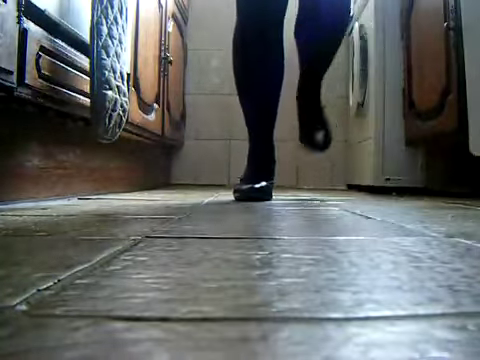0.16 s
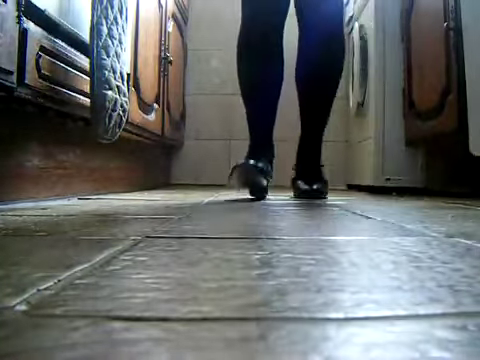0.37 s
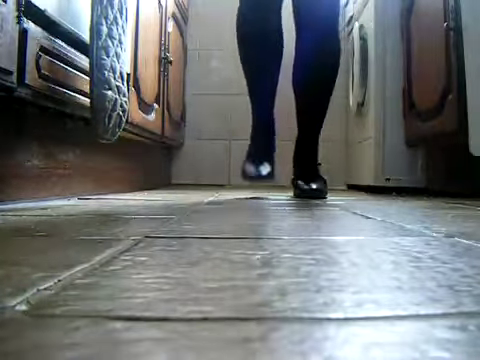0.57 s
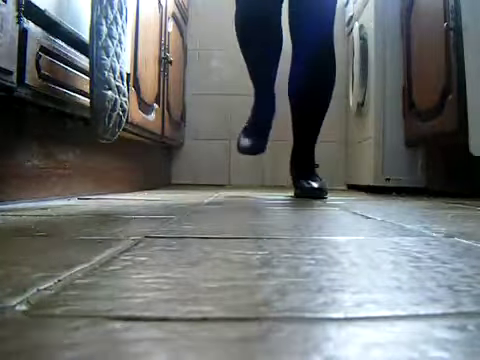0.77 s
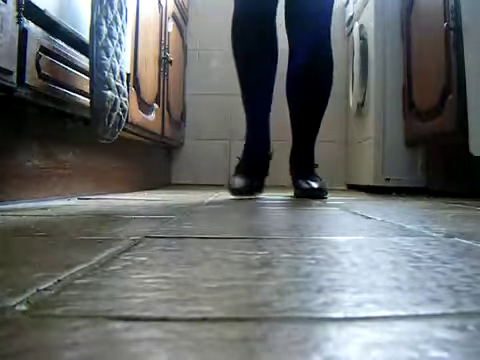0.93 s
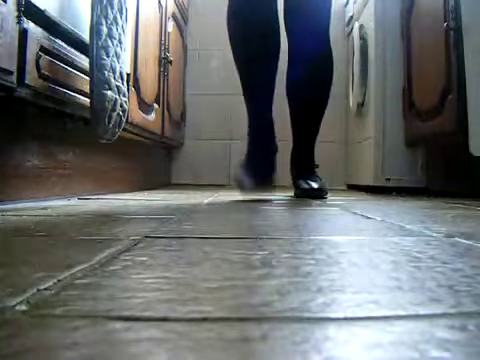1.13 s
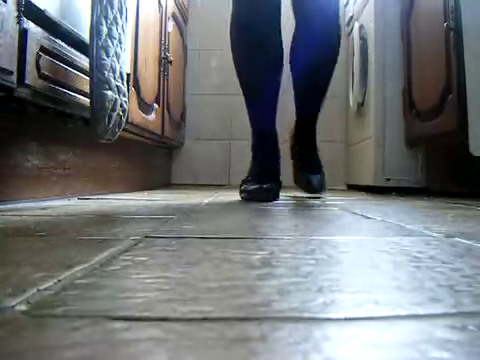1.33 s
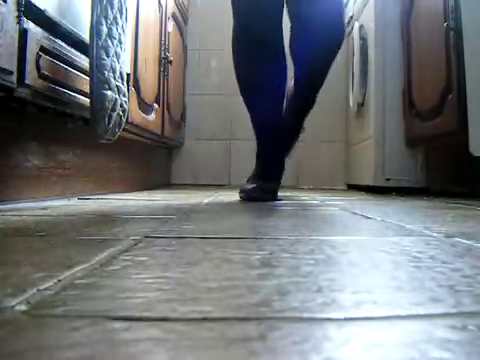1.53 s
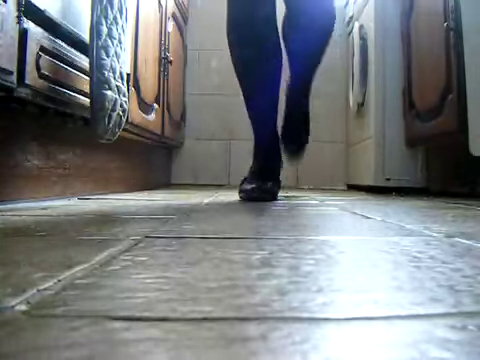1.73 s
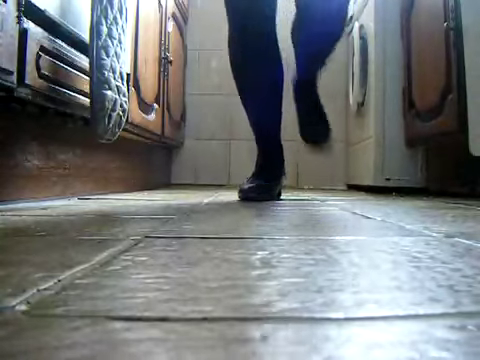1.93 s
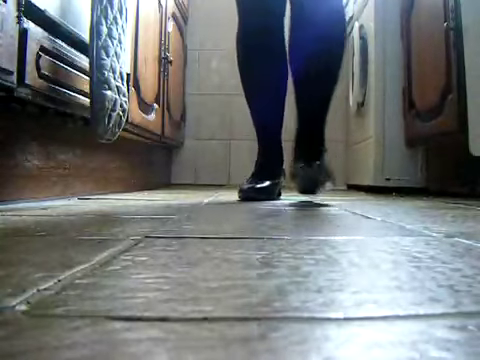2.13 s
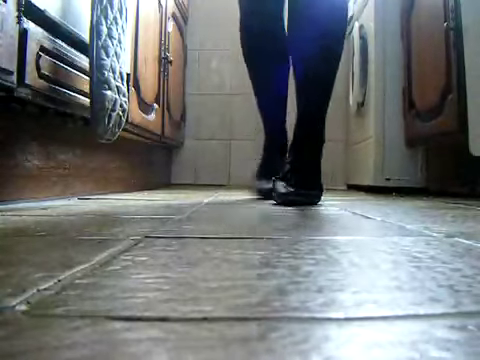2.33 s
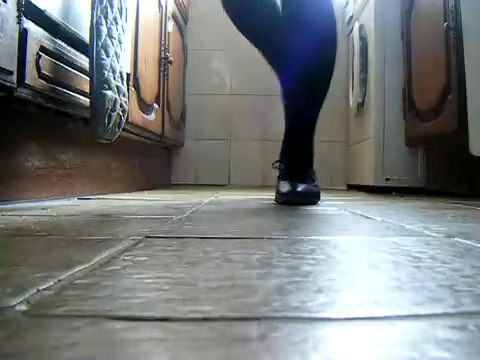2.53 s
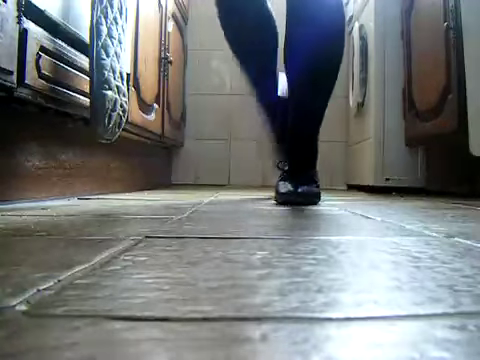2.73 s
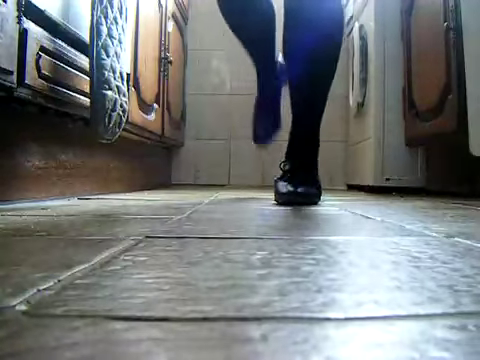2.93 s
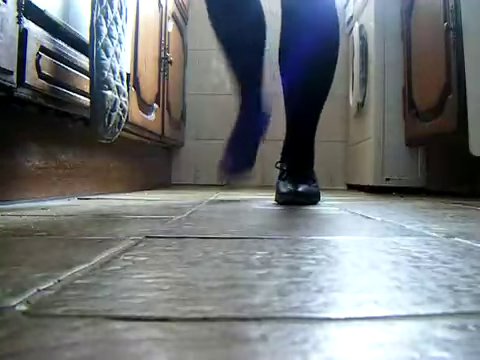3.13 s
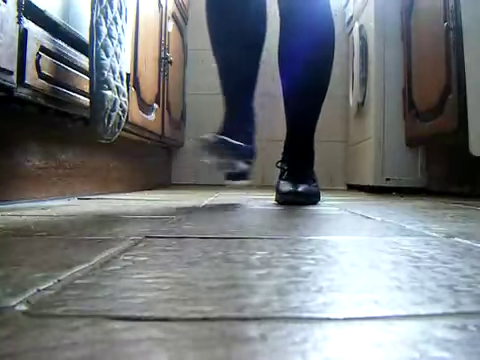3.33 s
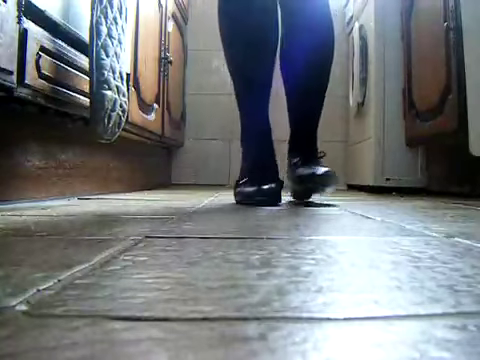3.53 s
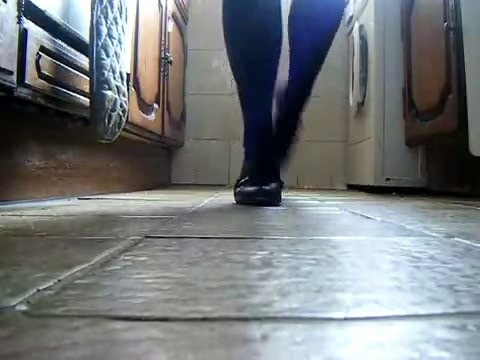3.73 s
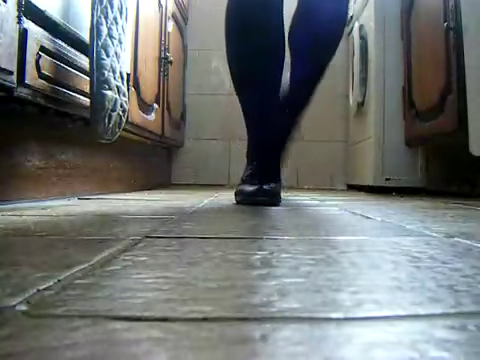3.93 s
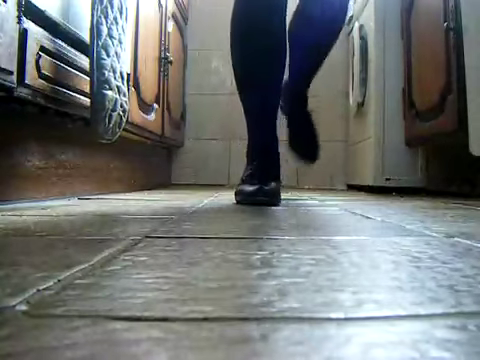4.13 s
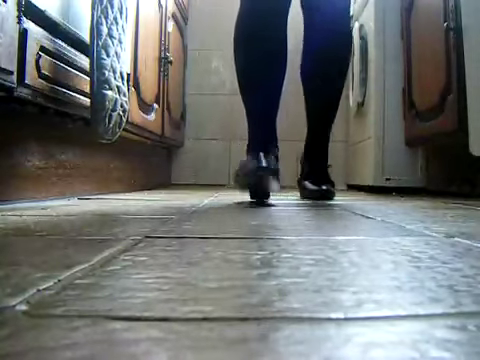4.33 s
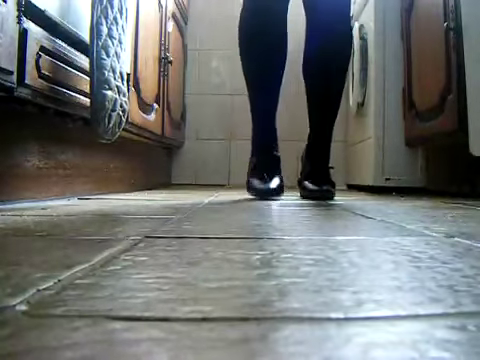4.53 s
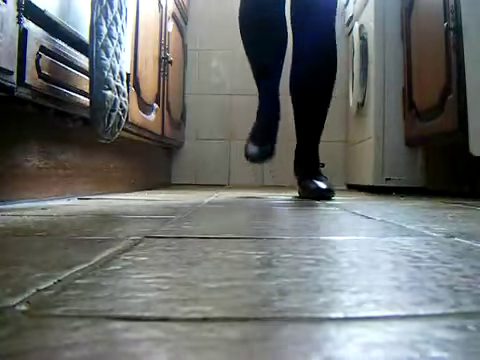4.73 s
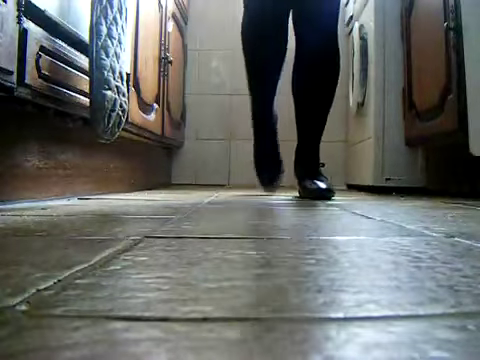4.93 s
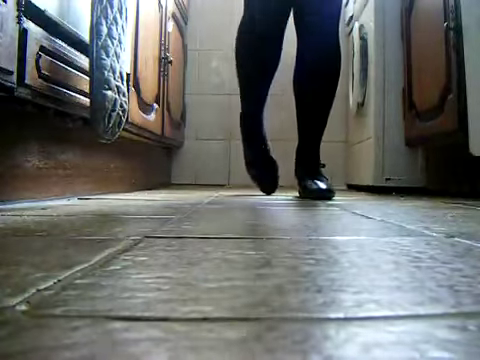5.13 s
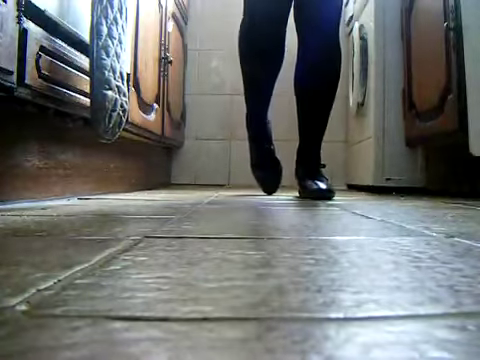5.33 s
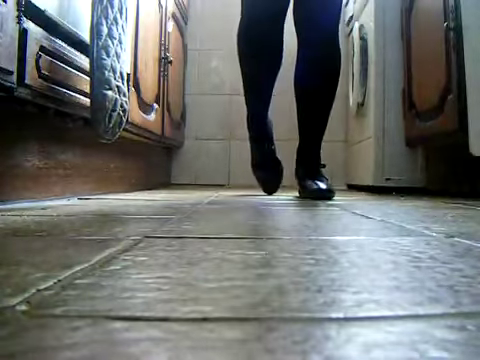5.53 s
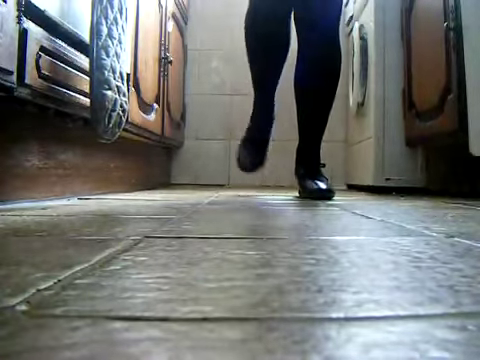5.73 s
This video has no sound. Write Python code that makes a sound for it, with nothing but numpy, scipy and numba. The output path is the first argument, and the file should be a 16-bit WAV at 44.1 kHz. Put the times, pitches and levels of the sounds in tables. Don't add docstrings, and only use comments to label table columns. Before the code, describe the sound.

Tap shoes with metal plates strike a tiled kitchen floor, heard from a small camera microphone lying on the tiles. A hard ringing blow lands at 0.1 s, followed by a medium tap at 0.5 and a sharp scraping brush near 0.7. Lighter taps and rattles follow around 1.1 to 1.6, then a heel thud at 1.8. A quick cluster runs from 2.0 to 2.75, with a brush and heel together at 3.0. Hard, bright toe clacks hit at 3.4 and 3.85, a heel at 4.2, a firm toe at 4.5 and a strong scrape at 4.7. Sparse brushes at 4.9 and 5.2 end with a soft heel; then only quiet room air, hiss and a barely audible refrigerator hum. Faint shoe and cloth shuffling lies between blows. Every hit has a short, boxy echo of about 0.3 s, pumped up by gain control, with crunchy clipped attacks and little high treble.

```python
import sys
import numpy as np
from scipy import signal
from scipy.fft import rfft, irfft, next_fast_len
from scipy.io import wavfile
from scipy.ndimage import map_coordinates
from numba import njit

SR = 44100
rng = np.random.default_rng(int(sys.argv[2]) if len(sys.argv) > 2 else 0)


def makeup_ratio(level_db):
    decades = np.asarray(level_db, float) / 20
    return 10 ** decades


def unload_audio(sound):
    columns = np.transpose(np.atleast_2d(sound))
    steps = np.round(np.clip(columns, -1, 1) * 32767)
    wavfile.write(sys.argv[1], SR, steps.astype(np.int16))


N = 255339
CONTACT_SIZE = 1 << 14
SQUARE_BLOW = dict(crack_db=1, crack_t60_s=0.029, rise_s=0.00049, tick_db=3, scrape_db=1.0)
TOE_CLICK_HZ = 3990

# (time [s], force [dB], plate ring [Hz], plate click [dB], overtone [Hz])
TOE_BLOWS = [
    (0.0871, 14, 956, -7.5, 2870),
    (0.4873, 6.5, 1017, -7, 3980),
    (1.383, 3.5, 874, -5.5, 4340),
    (2.2385, 5, 1087, -14, 5560),
    (2.404, 5.5, 1062, -9, 2110),
    (2.5604, 4, 833, -1, 3600),
    (3.3906, 13.5, 884, -0.5, 5500),
    (3.6615, 6.5, 717, -7, 2050),
    (3.842, 12.5, 1143, -14.5, 3400),
    (4.4894, 8.5, 1042, -12, 4210),
]


def toe_blows():
    time_s, force_db, ring_hz, click_db, overtone_hz = np.transpose(TOE_BLOWS)
    click_hz = TOE_CLICK_HZ + 0.17 * (overtone_hz - TOE_CLICK_HZ)
    crack = taps(time_s, force_db, -29.5, ring_hz, click_db, click_hz, **SQUARE_BLOW)
    clack_db = 5.5 + 0.79 * force_db
    return crack + clacks(time_s, clack_db, 1.061 * ring_hz, force_db - 6.5, overtone_hz)


# (time [s], force [dB])
HEEL_DROPS = [
    (1.8334, 2),
    (2.9975, 1.5),
    (3.056, -16),
    (4.2098, 2),
    (5.2146, -10.5),
]


def heel_drops():
    time_s, force_db = np.transpose(HEEL_DROPS)
    click_hz = 3600
    thud = taps(time_s, force_db, 20, 480, -11, click_hz, **SQUARE_BLOW)
    return thud + clacks(time_s, force_db - 9, 560, force_db - 30, click_hz)


# (time [s], force [dB], plate ring [Hz], plate click [dB])
LIGHT_TOUCHES = [
    (0.0641, -20, 1460, 21),
    (0.452, -23.5, 850, -16),
    (3.188, -25, 960, -13),
    (3.5893, -24.5, 870, -16),
]


def light_touches():
    time_s, force_db, ring_hz, click_db = np.transpose(LIGHT_TOUCHES)
    touch = taps(time_s, force_db, -7, ring_hz, click_db, TOE_CLICK_HZ, **SQUARE_BLOW)
    return touch + clacks(time_s, force_db + 5, ring_hz, force_db - 23.5, TOE_CLICK_HZ)


# (time [s], force [dB], plate ring [Hz], clack [Hz], plate click [Hz])
GLANCING_BRUSHES = [(0.2938, -6, 1730, 1500, 2100), (0.6452, -13, 766, 770, 2960),
                    (0.684, 6.5, 726, 3100, 3300), (0.8522, -2.5, 920, 1070, 4600),
                    (1.085, -0.5, 770, 1587, 3700), (1.6077, 4.5, 640, 1700, 3120),
                    (2.0121, 2.5, 674, 1725, 2200), (2.743, -2, 620, 1100, 2030),
                    (2.994, 2, 560, 2185, 3800), (3.2196, -8, 874, 2050, 2000),
                    (4.0284, -7, 1010, 1564, 2040), (4.6834, 10, 688, 2430, 2750),
                    (4.9256, -1, 620, 1110, 4620), (5.1781, 2.5, 935, 1690, 3400)]


def glancing_brushes():
    time_s, force_db, ring_hz, clack_hz, click_hz = np.transpose(GLANCING_BRUSHES)
    thud_db = -0.5 - 0.3 * force_db
    click_db = -2 + 0.42 * force_db
    brush = taps(time_s, force_db, thud_db, ring_hz, click_db, click_hz,
                 crack_db=3.5, crack_t60_s=0.017, rise_s=0.00022, tick_db=12.5, scrape_db=0)
    return brush + clacks(time_s, 4.5 + 0.98 * force_db, clack_hz, force_db - 15, click_hz)


# (time [s], force [dB], plate ring [Hz], plate click [dB])
PLATE_ROCKS = [(0.001, -12, 645, -2), (0.1551, -12, 796, -35), (0.5488, -9.5, 975, -10),
               (0.5832, -6, 1080, -6.5), (1.1284, -2, 880, 6), (1.1566, -0.5, 990, 20),
               (1.4687, -12.5, 820, -7), (1.5036, -11, 910, 3.5), (1.5265, -11.5, 837, -4.5),
               (2.0673, -17.5, 474, -21), (2.3177, -4, 747, -5.5), (2.605, 0, 1130, 7),
               (2.6235, -13.5, 870, 1.5), (2.631, -9, 990, 14), (2.258, -1, 1065, -6.5),
               (2.676, -10.5, 840, -4), (3.4132, -2, 730, 15), (3.781, -17.5, 800, -6.5),
               (3.8892, 0.5, 1210, 13.5), (4.6145, -14, 1030, 23), (4.7298, -3, 815, -1),
               (0.715, -0.5, 760, 19.5), (3.438, -5, 800, -1)]


def plate_rocks():
    time_s, force_db, ring_hz, click_db = np.transpose(PLATE_ROCKS)
    return taps(time_s, force_db, -8.5, ring_hz, click_db, 3880,
                crack_db=1.5, crack_t60_s=0.072, rise_s=0.00037, tick_db=-39.0, scrape_db=-5.5)


# (delay [s], level [dB])
WALL_ECHOES = [(.0022, -22.5), (.0046, -39), (.0075, -6), (0.0125, -10), (.021, -19)]
# (centre [Hz], width [Hz], level [dB])
CUPBOARD_MODES = [(249.4, 3.9, 0), (304.6, 14, 3.5), (328, 8.9, -11), (392.2, 7.4, 6), (620, 200, -2),
                  (766, 58, -1), (836, 15, 4.5), (1087, 240, -0.5), (2900, 21, -11), (3980, 79, -21)]


def taps(time_s, force_db, thud_db, ring_hz, click_db, click_hz, *, crack_db, crack_t60_s, rise_s, tick_db, scrape_db):
    time_s, force_db, thud_db, ring_hz, click_db, click_hz = columns(
        time_s, force_db, thud_db, ring_hz, click_db, click_hz)
    lead_s = 0.0038
    count, lead = len(time_s), round(lead_s * SR)
    shape = (count, CONTACT_SIZE)
    t, f = np.arange(CONTACT_SIZE) / SR, np.fft.rfftfreq(CONTACT_SIZE, 1 / SR)

    envelope = makeup_ratio(crack_db - 60 * t / crack_t60_s) * (1 - np.exp(-t / rise_s))
    crack = envelope * rng.standard_normal(shape)
    early = crack.copy()
    for delay_s, db in WALL_ECHOES:
        early += makeup_ratio(db) * np.roll(crack, round(delay_s * SR), axis=1)
    early = np.roll(early, lead, axis=1)
    through_floor = makeup_ratio(-24) * np.linspace(.3, 1, lead)
    early[:, :lead] = through_floor * rng.standard_normal((count, lead))
    tail = np.roll(echoes(count, CONTACT_SIZE), lead, axis=1)
    tail[:, :lead] = 0

    tile = np.abs(resonance(f, 1720, 2830))
    ring = np.abs(resonance(f, ring_hz, ring_hz / 1.6)) ** 2
    click = makeup_ratio(click_db) * np.abs(resonance(f, click_hz, 1150)) ** 2
    thud = makeup_ratio(thud_db) * np.abs(resonance(f, 293.4, 280)) ** 2
    scrape = makeup_ratio(click_db + scrape_db) * tile
    shoe = unit(np.sqrt(ring ** 2 + click ** 2 + thud ** 2 + scrape ** 2))

    modes = sum(makeup_ratio(db) * resonance(f, hz, width_hz) for hz, width_hz, db in CUPBOARD_MODES)
    room = 1 + modes / 2
    direct = rfft(early) * causal(np.hypot(shoe, makeup_ratio(tick_db) * tile))
    sound = irfft(direct + rfft(tail) * causal(shoe) * room, CONTACT_SIZE)
    return lay(time_s[:, 0] - lead_s, makeup_ratio(force_db) * sound)


def clacks(time_s, clack_db, clack_hz, overtone_db, overtone_hz):
    time_s, clack_db, clack_hz, overtone_db, overtone_hz = columns(
        time_s, clack_db, clack_hz, overtone_db, overtone_hz)
    t, f = np.arange(CONTACT_SIZE) / SR, np.fft.rfftfreq(CONTACT_SIZE, 1 / SR)
    clack_t60_s, contact_s = 0.07, 0.0035
    sole_damping = 1 / (1 + (t / contact_s) ** 8)
    clack = -makeup_ratio(clack_db - 60 * t / clack_t60_s) * sole_damping * np.sin(2 * np.pi * clack_hz * t)
    mode = unit(resonance(f, overtone_hz, 450) ** 2)
    overtone = irfft(rfft(echoes(len(time_s), CONTACT_SIZE)) * mode, CONTACT_SIZE)
    return lay(time_s[:, 0], clack + makeup_ratio(overtone_db) * overtone)


# (frequency [Hz], t60 [s])
KITCHEN_T60 = [(150, 0.19), (400, 0.32), (1000, 0.28), (2500, 0.27), (6000, 0.24)]


def echoes(count, size):
    hz, t, z = signal.stft(rng.standard_normal((count, size)), SR, nperseg=256)
    decay = makeup_ratio(-60 * t / along(KITCHEN_T60, hz)[:, None])
    tail = signal.istft(z * decay, SR, nperseg=256)[1][:, :size]
    clumps_per_s, clump_db = 162.3, 1.5
    position = np.arange(size) * clumps_per_s / SR
    grid = np.broadcast_arrays(np.arange(count)[:, None], position)
    clumps = map_coordinates(rng.standard_normal((count, 128)), grid, order=1)
    onset = 1 - np.exp(-np.arange(size) / SR / 0.0015)
    return makeup_ratio(clump_db * clumps) * tail * onset


def columns(*values):
    return np.array(np.broadcast_arrays(*values))[:, :, None]


def resonance(f, centre_hz, width_hz):
    return 1j * f * width_hz / (centre_hz ** 2 - f * f + 1j * f * width_hz)


def causal(gain):
    cepstrum = irfft(np.log(gain + 1e-6))
    half = cepstrum.shape[-1] // 2
    cepstrum[..., 1:half] *= 2
    cepstrum[..., half + 1:] = 0
    return np.exp(rfft(cepstrum))


def along(points, hz):
    f, v = np.transpose(points)
    return np.interp(np.log(hz + 1), np.log(f + 1), v)


def coloured(x, points):
    size = x.shape[-1]
    m = 2 * next_fast_len(size // 2 + 4096)
    gain = makeup_ratio(along(points, np.fft.rfftfreq(m, 1 / SR)))
    return irfft(rfft(x, m) * causal(gain), m)[..., :size]


def unit(x):
    return x / np.sqrt(np.mean(np.abs(x) ** 2, axis=-1, keepdims=True) + 1e-20)


def lay(starts_s, rows):
    size = rows.shape[1]
    out = np.zeros(N + 2 * size)
    for start_s, row in zip(starts_s, rows):
        out[size + round(start_s * SR):][:size] += row
    return out[size:size + N]


# (time [s], level [dB])
SHUFFLE_LEVEL = [
    (0, -47),
    (1.9, -60.5),
    (1.98, -35.5),
    (2.05, -39.5),
    (4.25, -60),
    (4.33, -47),
    (4.48, -40.5),
    (4.55, -91),
    (5.79, -84),
]
# (frequency [Hz], density [dB per Hz])
CLOTH_COLOUR = [(150, -28), (400, -12), (1000, -6.5), (1500, -11), (2000, -7.5), (5000, -22)]


def shuffling():
    lumps = map_coordinates(rng.standard_normal(N // 2000 + 4), [np.arange(N) / 2000])
    level_db = np.interp(np.arange(N) / SR, *np.transpose(SHUFFLE_LEVEL)) + 1.4 * lumps
    return makeup_ratio(level_db) * unit(coloured(rng.standard_normal(N), CLOTH_COLOUR))


# (frequency [Hz], level [dB rms])
REFRIGERATOR_HUM = [(120, -63)]


def refrigerator():
    t = np.arange(N) / SR
    return sum(np.sqrt(2) * makeup_ratio(db) * np.sin(2 * np.pi * hz * t) for hz, db in REFRIGERATOR_HUM)


# (frequency [Hz], density [dB per Hz])
AIR_COLOUR = [(60, -52.5), (150, 2.5), (300, 0.5), (700, -0.5), (1500, -4), (4400, -9), (8000, -15)]


def room_air():
    return makeup_ratio(-45) * unit(coloured(rng.standard_normal(N), AIR_COLOUR))


# (frequency [Hz], gain [dB])
MICROPHONE_RESPONSE = [(20, -71), (120, -5), (300, -6.5), (1000, -5), (4000, -7), (8000, -11)]


def scene():
    shoes = toe_blows() + heel_drops() + light_touches() + glancing_brushes() + plate_rocks()
    background = shuffling() + refrigerator() + room_air()
    return (coloured(shoes, MICROPHONE_RESPONSE) + background)[None]


@njit
def follow(size, rise, fall):
    level = np.zeros_like(size)
    for i in range(1, len(size)):
        level[i] = level[i - 1] * fall + rise * max(size[i] - level[i - 1], 0.)
    return level


def low_pass(x):
    return signal.sosfilt(signal.butter(12, 15800, fs=SR, output="sos"), x)


# (frequency [Hz], gain [dB])
CAPACITOR = [(20, -47), (100, -12), (250, -8.5), (500, -1.5)]
# (frequency [Hz], gain [dB])
CONVERTER_BAND = [(4000, 1), (5000, 2), (5550, -5), (6000, -4.5), (6600, -16.5), (7200, -39), (8000, -88.5)]
# (frequency [Hz], density [dB per Hz])
CONVERTER_RUMBLE = [(15, -18.5), (60, 1), (150, -7), (300, -60)]


def record(dry):
    attack_s, release_db_per_s, lag_s, target_db = 0.0018, 240, 0.00052, -11
    level = follow(np.abs(dry[0]), 1 / (attack_s * SR), makeup_ratio(-release_db_per_s / SR))
    level = np.pad(level, (round(lag_s * SR), 0))[:N]
    held = dry / np.maximum(1, level / makeup_ratio(target_db))
    overload_db, knee = -0.03, 3
    driven = held / (1 + np.abs(held / makeup_ratio(overload_db)) ** knee) ** (1 / knee)
    rumble = makeup_ratio(-66) * unit(coloured(rng.standard_normal(N), CONVERTER_RUMBLE))
    converted = coloured(coloured(driven, CAPACITOR), CONVERTER_BAND)
    offset = -.0038
    clipped = np.clip(converted + rumble + offset, -1, 1)
    return low_pass(clipped)


dry = scene()
out = record(dry)
unload_audio(out)
```